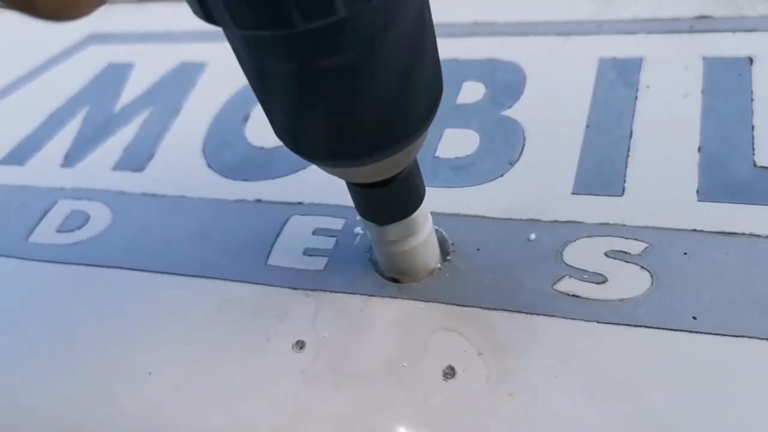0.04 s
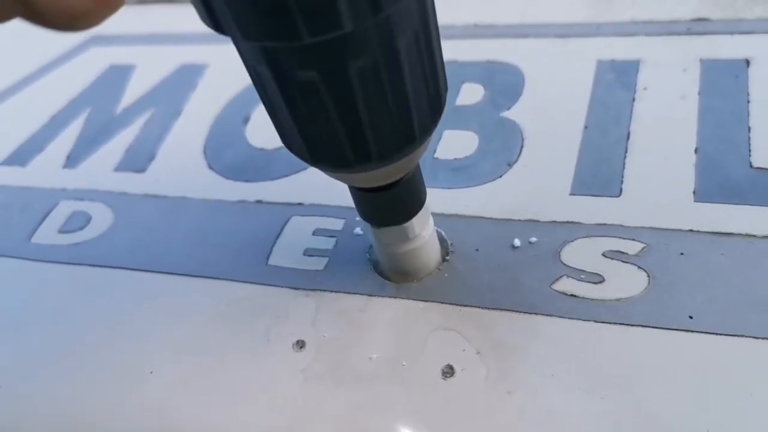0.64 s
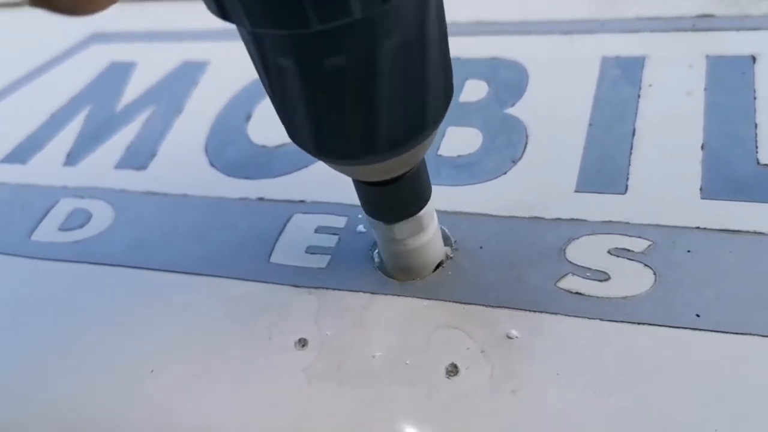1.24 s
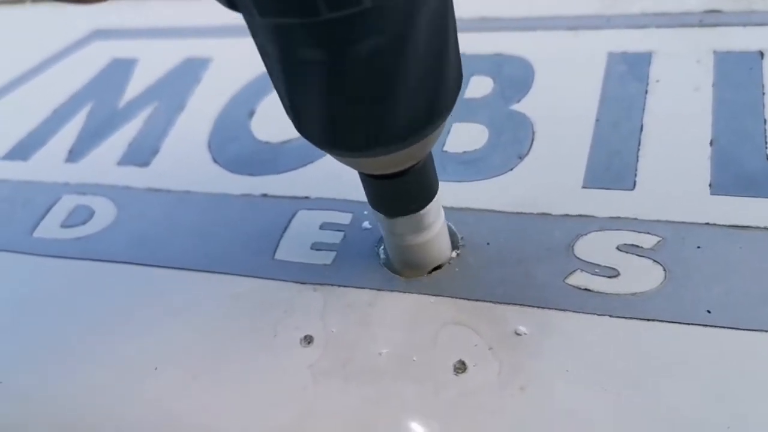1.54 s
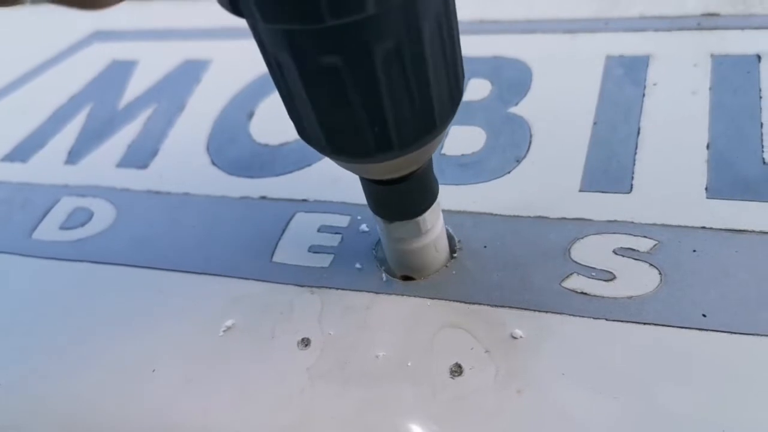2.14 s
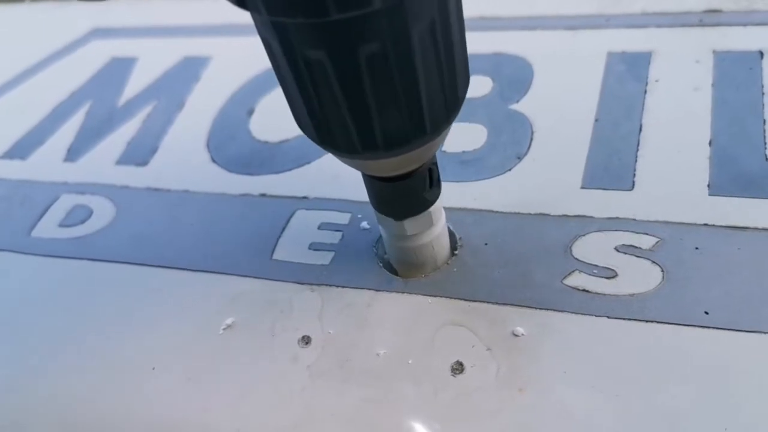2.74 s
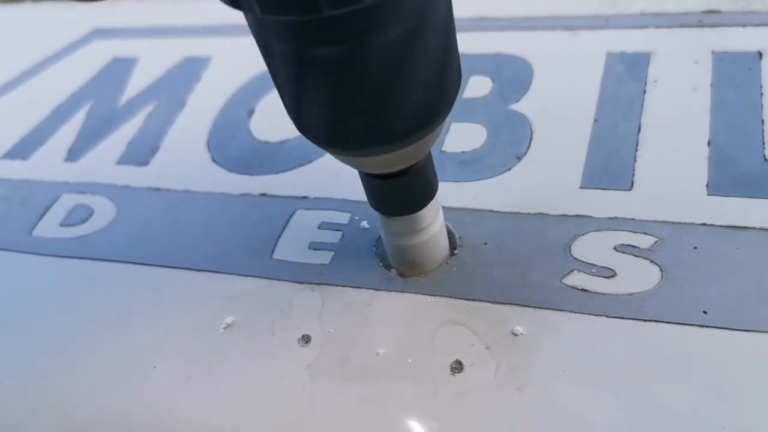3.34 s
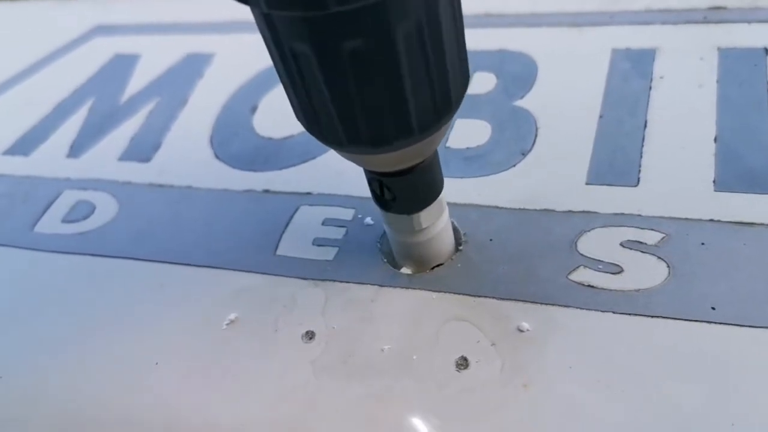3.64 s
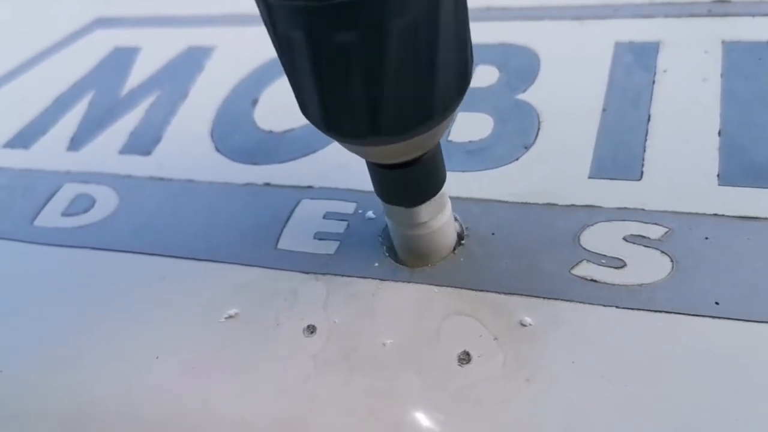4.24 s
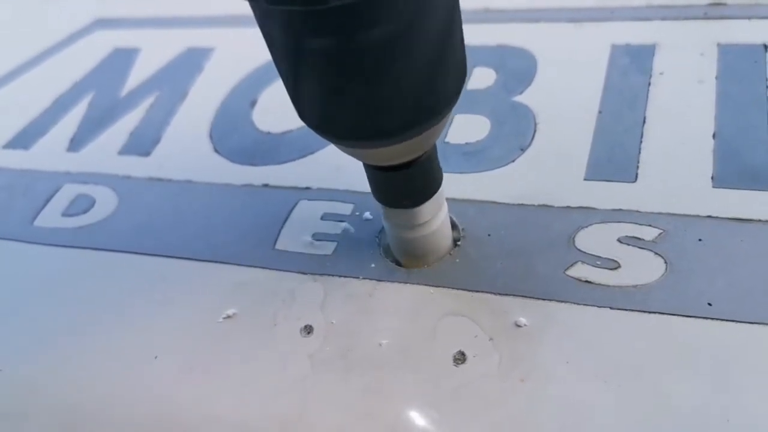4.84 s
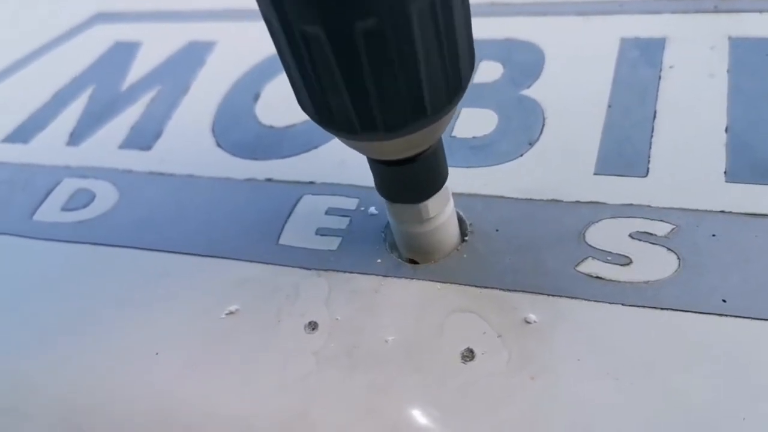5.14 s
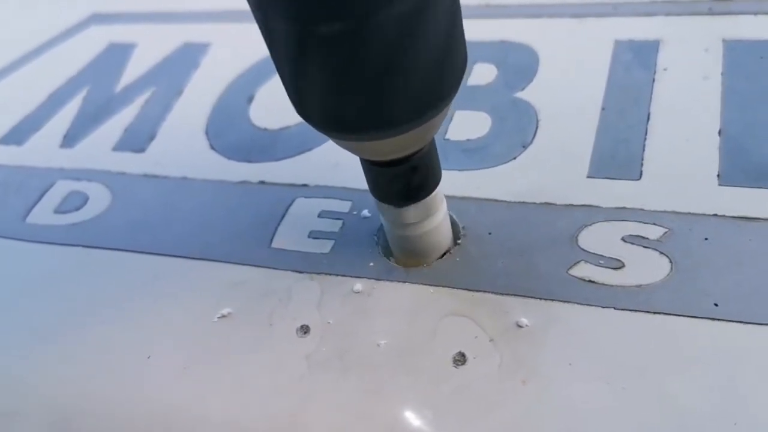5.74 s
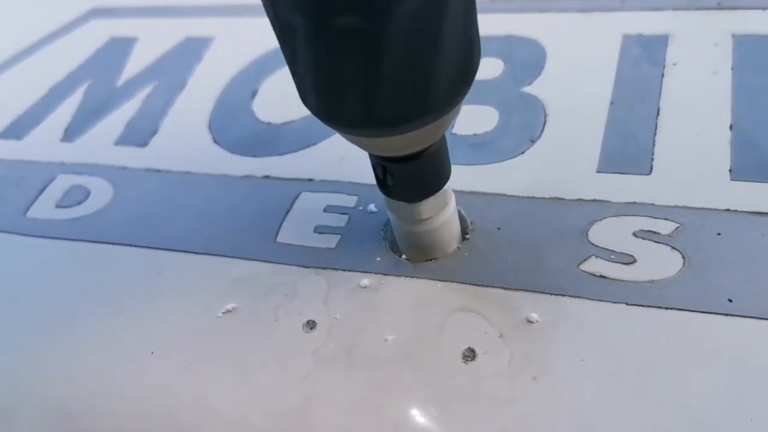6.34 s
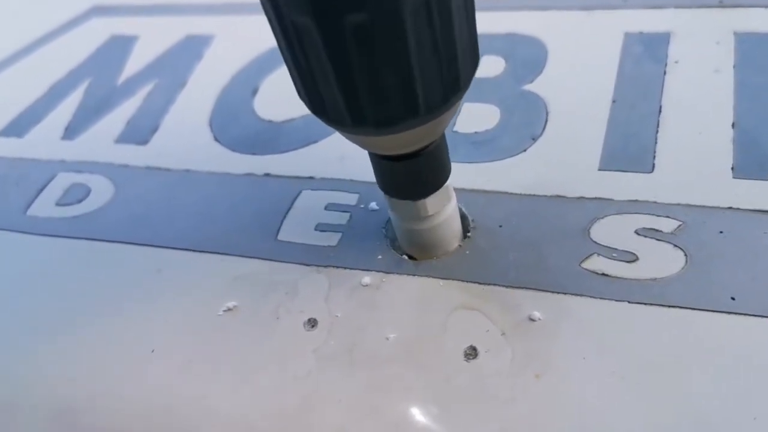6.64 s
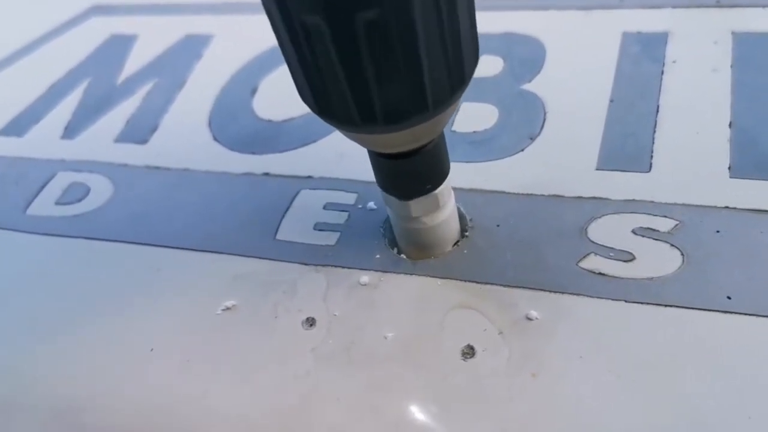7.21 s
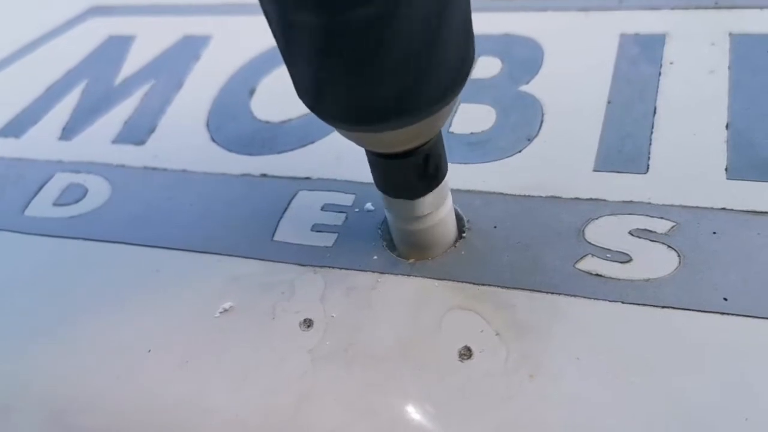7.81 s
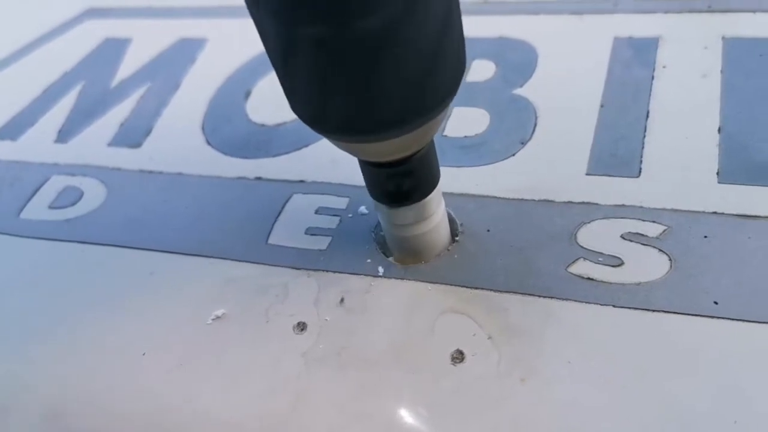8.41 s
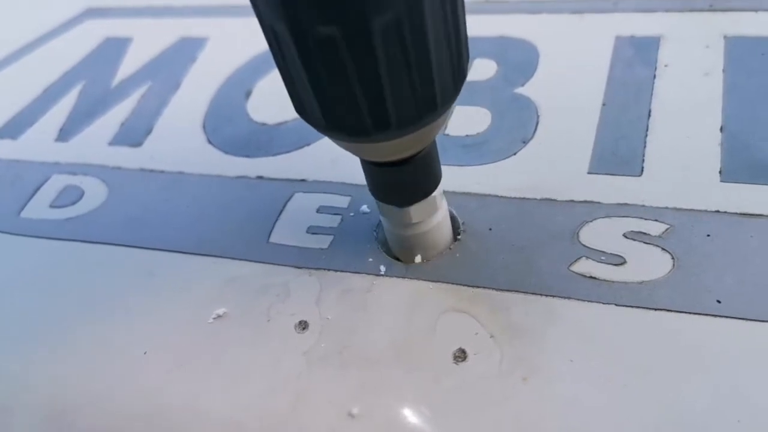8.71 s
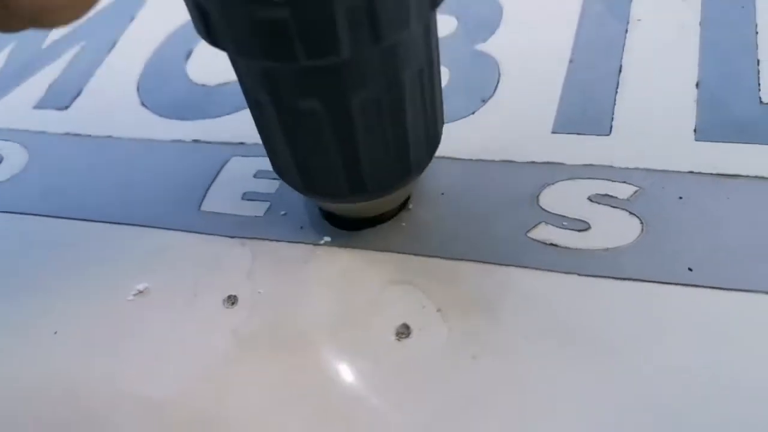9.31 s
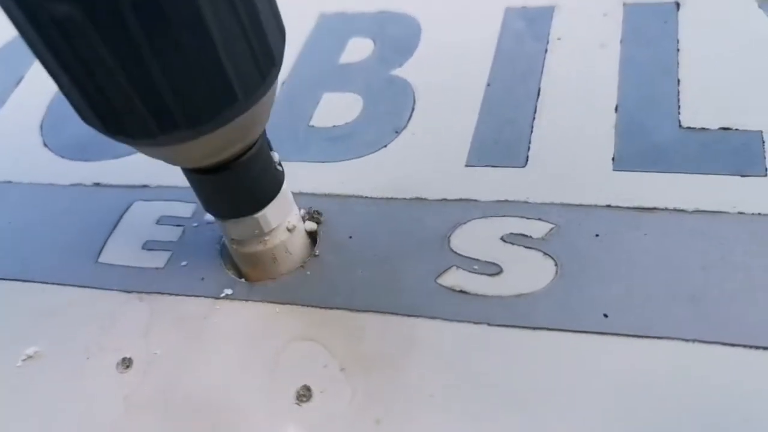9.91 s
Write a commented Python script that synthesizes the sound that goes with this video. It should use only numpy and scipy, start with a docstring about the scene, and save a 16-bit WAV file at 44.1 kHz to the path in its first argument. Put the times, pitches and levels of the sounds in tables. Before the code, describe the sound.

A cordless drill grinds a hole saw into a vehicle panel in short, rasping bursts, then breaks through with a thump.

```python
"""A cordless drill works a small hole saw through a vehicle's body panel in twenty short pulls, close by.
At each pull the trigger clicks and the motor whirls up: the saw rasps by friction, the gears whine at
multiples of the shaft speed, and the snagging teeth drive the panel's modes into a rattle over a low boom.
On the last pull the saw breaks through, the chuck thumps the panel, steel clacks and the saw scrapes out.
Quiet outdoor air lies underneath, and a soft rush comes up at the end."""
import sys
import numpy as np
from scipy import signal
from scipy.fft import rfft, irfft, next_fast_len
from scipy.io import wavfile
from scipy.ndimage import uniform_filter1d

SR = 44100
rng = np.random.default_rng(int(sys.argv[2]) if len(sys.argv) > 2 else 0)


def master(y):
    """Save y as 16-bit WAV."""
    cut = np.clip(np.atleast_2d(y).T, -1, 1)
    pcm = np.round(cut * 32767)  # scale
    wavfile.write(sys.argv[1], SR, pcm.astype(np.int16))


N = 439236
T = np.arange(N) / SR


def undb(db):
    """Amplitude ratio of a level in decibels."""
    return 10 ** (np.asarray(db) / 20)


def unit(x):
    """Normalisation to rms 1."""
    return x / np.sqrt(np.mean(x ** 2))


def since(s):
    """Time elapsed since s; zero before."""
    return np.maximum(T - s, 0)


def curve(rows):
    """Envelope interpolated through (t/s, level/dB) rows; silent before the first."""
    return undb(np.interp(T, *np.transpose(rows), left=-np.inf))


def burst(s, t60):
    """Exponential decay from a jump to 1 at time s."""
    out, span = np.zeros(N), slice(*np.searchsorted(T, [s, s + 2 * t60]))
    out[span] = undb(-60 * (T[span] - s) / t60)
    return out


def noise():
    """Uncorrelated white noise, left and right."""
    return rng.standard_normal((2, N))


def walk(rate, size=N):
    """Smooth random fluctuation with rate new values per SR steps; spread near 1."""
    hold = max(int(SR / rate), 1)
    steps = np.repeat(rng.standard_normal(size // hold + 1), hold)
    return 1.202 * uniform_filter1d(steps, hold)[:size]


def shape(x, response):
    """Linear filtering: the spectrum is multiplied by a frequency response."""
    size = next_fast_len(N + SR)
    hz = np.maximum(np.arange(size // 2 + 1) * SR / size, 1)
    return irfft(rfft(x, size) * response(hz), size)[..., :N]


def colour(x, points):
    """Spectral weighting through (f/Hz, level/dB) points."""
    hz, db = np.transpose(points)
    return shape(x, lambda f: undb(np.interp(np.log(f), np.log(hz), db)))


def ring(x, modes):
    """Superposition of damped resonators, given as (f/Hz, bandwidth/Hz, level/dB)."""
    return shape(x, lambda f: sum(undb(db) / (1 + 1j * (f * f - hz * hz) / (f * width))
                                  for hz, width, db in modes))


def pan(x, right_db):
    """A level difference between the sides places a source."""
    return x * undb(np.array([[-right_db], [right_db]]) / 2)


def two_paths(x, lead_s=0.00019, scatter_rad=1.52):
    """Path difference: the left side leads, and near reflections scatter its treble phase."""
    def response(f):
        scatter = scatter_rad * np.minimum(f / 2500, 1) * walk(14, size=len(f))
        return np.exp(1j * (scatter + 2 * np.pi * f * lead_s))
    return np.array([shape(x, response), x])


# spectrum of the outdoor air: f/Hz, relative level/dB
AIR_SPECTRUM = [(30, -2), (100, 1), (200, 0), (400, -9), (800, -12.5), (1300, -14.5), (2500, -16),
                (4000, -21), (6300, -31), (10000, -30), (13000, -39), (16000, -42)]


def outdoor_air(level_db=-61):
    """Ambient noise: mostly low, largely coherent between the sides, slowly drifting in level."""
    air = colour(rng.standard_normal(N) + 0.39 * noise(), AIR_SPECTRUM)
    return unit(air) * undb(level_db + walk(1.4))


# trigger pulls: start t/s, brake t/s, bite time constant/s, throttling (0 = full speed, 1 = held part way),
# lead of the click/s, panel boom level/dB
PULLS = [(0.05, 0.228, 0.013, 0.22, 0.035, -42.5), (.456, 0.612, 0.025, 0.28, 0.085, -45),
         (0.901, 1.038, .006, 0.96, 0.077, -55), (1.239, 1.384, .008, 0.91, 0.062, -45),
         (1.593, 1.773, .013, 0.14, 0.045, -38), (2.001, 2.203, .022, 0.01, .052, -41),
         (2.453, 2.661, 0.0089, 0.02, .08, -38), (2.897, 3.114, 0.022, 0, 0.061, -39),
         (3.374, 3.592, .012, 0, 0.052, -39), (3.855, 4.061, .008, 0.01, 0.055, -43),
         (4.312, 4.549, 0.0098, 0, 0.061, -40.5), (4.815, 5.027, .012, 0, .07, -46),
         (5.302, 5.518, 0.0089, 0, 0.079, -48), (5.788, 5.98, .014, 0, .074, -45.5),
         (6.243, 6.46, .012, 0.01, .073, -47), (6.75, 7.005, .017, 0, 0.053, -46.5),
         (7.32, 7.586, .012, 0, .072, -47), (7.844, 8.121, 0.0093, 0.01, .07, -42.5),
         (8.401, 8.717, .022, 0, 0.054, -49.5), (8.987, 9.304, 0.0076, 0.02, 0.057, -42.5)]


def trigger(click_db=-57, second_db=-4, gap_s=0.034, t60=0.019):
    """Two impact transients in plastic at each pull: the slider moves, then the switch closes."""
    first = undb(click_db) * sum(burst(start - lead, t60) for start, _, _, _, lead, _ in PULLS)
    second = undb(second_db) * np.interp(T - gap_s, T, first)
    plastic = colour(noise(), [(300, -15), (1500, -9), (2800, 6), (5000, -23), (10000, -3.5), (16000, -35)])
    return pan(unit(plastic), right_db=16) * (first + second)


def latest_pull():
    """Step functions of time: each column of the most recent pull."""
    rows = np.array(PULLS)
    return rows[np.maximum(np.searchsorted(rows[:, 0], T) - 1, 0)].T


FULL_HZ, THROUGH_S = 381, 9.18  # full shaft speed; the moment the saw is through


def motor(ease_s=.066, coast_s=.15, stall_s=.09, ease_t60=0.75, brake_t60=0.12, rattle_t60=0.15):
    """First-order lag: speed and force build at a pull, sag as the finger eases and fall under the brake."""
    start, brake, bite, throttling, _, _ = latest_pull()
    throttling = np.clip(throttling, 0, 1)
    # a trigger held part way chops the current, gathers speed more slowly and is let go more abruptly
    part_way = throttling ** 2
    ease = np.minimum(brake - ease_s * (1 - .8 * part_way), THROUGH_S)
    age, eased, braked = since(start), since(ease), since(brake)
    spin_up_s = .023 + .35 * bite + .012 * part_way
    spun = 1 - np.exp(-age / spin_up_s)
    coasting = np.exp(-eased / coast_s - braked / stall_s)
    hz = (FULL_HZ - 43.97 * throttling) * spun * coasting * (1 + .003 * walk(40))
    # the gears strain hard while speeding up and a little while slowing down
    torque = np.minimum(1 - spun + .08 * (1 - coasting), 1)
    pressed = undb(-22 - 6 * part_way) * (1 - np.exp(-age / bite)) ** 1.25
    force = pressed * undb(-60 * (eased / ease_t60 + braked / brake_t60))
    # fast teeth hiss brighter
    treble = undb(2.5 - 7 * part_way) * spun ** 0.23 * coasting
    # slow teeth snag hardest, and the panel rattles less as the saw sinks in
    snag_db = 4 * np.exp(-age / 0.095) - 60 * braked / rattle_t60
    depth = np.cumsum(hz) / np.sum(hz)
    rattle = pressed * undb(np.interp(depth, [0, 1], [-10, -20.5]) + 5.5 * part_way + snag_db)
    chop = (part_way + 2.0 * np.exp(-age / 0.031)) * np.exp(-eased / .015)
    return hz, force, torque, chop, treble, rattle


# spectrum of gearbox and saw: f/Hz, left relative level/dB, right relative level/dB
GRIND_SPECTRUM = [(396, -2, -2), (974, -15.5, -12), (2067, -11, 0.0), (3000, -12.5, -0.8), (3216, -6, -8.5),
                  (4150, -8, 0.87), (5440, -9.5, -13), (6460, -19.5, -12.5), (6910, -21.5, -5),
                  (7730, -16.5, -14.5), (9230, -14, -7), (10580, -13, -8.5), (11830, -21, -18.5),
                  (15700.0, -19.5, -18.5)]


def grinding(turns, treble, worn_db=-5.0, carrier_ratio=4.5):
    """Friction noise: tooth flaws recur with each turn of the planet carrier, while grit never repeats."""
    flaws = rng.standard_normal(512)
    worn = np.interp(turns / carrier_ratio % 1 * 512, np.arange(512), flaws)
    grit = noise() * undb(walk(1800) + 0.98 * walk(150))
    contact = undb(worn_db) * two_paths(unit(worn)) + unit(grit)
    hz, *sides = np.transpose(GRIND_SPECTRUM)
    rasp = np.array([colour(x, np.c_[hz, db]) for x, db in zip(contact, sides)])
    rasp = unit(shape(rasp, lambda f: 1 / (1 + (480 / f) ** 4)))
    hiss = shape(rasp, lambda f: 1 / (1 + (6000 / f) ** 6))
    return rasp + (treble * undb(1.2 * walk(30)) - 1) * hiss


def shaft_tones(turns, partials, waver_db, slack_rad):
    """Rotational orders: partials locked to the shaft, each wavering in level and phase."""
    return sum(undb(db + waver_db * walk(50)) * np.sin(2 * np.pi * order * turns + slack_rad * walk(150))
               for order, db in partials)


# the strongest shaft-locked tones, gear mesh and, at 1.49x, the saw's teeth passing: multiple of shaft speed,
# relative level/dB
MESH_ORDERS = [(1.49, -17.5), (4.923, -12.5), (7.848, -17), (10, -20), (13, -13.5)]
# fainter motor and gear tones: multiple of shaft speed, relative level/dB
WHINE_ORDERS = [(.78, -24), (3.79, -32.5), (5.81, -25), (6.6, -27), (9.08, -34.5), (11.1, -20.5),
                (11.8, -47.5), (15.7, -25.5), (18.3, -21.5), (26, -17)]
# radiation response of the drill's housing: f/Hz, level/dB
HOUSING_RESPONSE = [(150, -14), (300, -3), (580, 0), (1000, -16), (1500, -8), (1800, 0), (5000, 0),
                    (12000, -3)]
# the housing's resonance, as one of two equal stages: f/Hz, bandwidth/Hz, level/dB
HOUSING_MODE = [(3000, 950, 0)]


def gears(turns, torque, grate_db=14.0, chirp_db=7.5):
    """Forced vibration: mesh tones whine, and chirp as they sweep through the housing's resonance."""
    mesh = shaft_tones(turns, MESH_ORDERS, waver_db=2, slack_rad=.12)
    faint = shaft_tones(turns, WHINE_ORDERS, waver_db=3, slack_rad=.25)
    whine = colour(mesh + faint, HOUSING_RESPONSE)
    strained = shaft_tones(turns, [(10, -4), (13, 0), (15.7, -3)], waver_db=2.5, slack_rad=.4)
    strained = strained * torque * undb(2.5 * walk(700))
    # strained teeth also grate, once they are moving
    grating = undb(grate_db) * torque * (1 - torque) * rng.standard_normal(N)
    chirps = ring(ring(strained + grating, HOUSING_MODE), HOUSING_MODE)
    return pan(two_paths(whine + undb(chirp_db) * chirps), right_db=4.5)


def whistle(hz, turns, chop_hz=7850, lower_db=-14, upper_db=-17):
    """Amplitude modulation: the turning rotor splits the controller's chopping tone into two sidebands."""
    lower, upper = (np.sin(2 * np.pi * (chop_hz * T + side * 2 * turns)) for side in (-1, 1))
    return pan((undb(lower_db) * lower + undb(upper_db) * upper) * hz / FULL_HZ, right_db=17.5)


# bending modes of the panel: f/Hz, relative level/dB, free decay T60/s
PANEL_MODES = [(53, -16, 0.28), (150, -11, 0.14), (203, 3, 0.053), (244.4, 0, 0.093), (314.7, 1, 0.037),
               (401, 3, 0.092), (523, 2.5, 0.045), (571, -2.5, 0.048), (617, -11, 0.051),
               (750, -37.5, 0.086)]


def panel(force, damping=1):
    """Modal response of the sheet: added damping widens each mode and shortens its decay."""
    return ring(force, [(hz, damping * np.log(1000) / np.pi / t60, db) for hz, db, t60 in PANEL_MODES])


def panel_rattle():
    """Random excitation: saw teeth snag on the rim of the hole; the higher modes reach the left weaker."""
    sheet = unit(panel(rng.standard_normal(N) * undb(2.25 * walk(250))))
    shaded = colour(sheet, [(150, 1), (300, -1.2), (600, -8.5)])
    return np.array([shaded, sheet])


def drill(rasp_db=-1.21):
    """Superposition of rasp, gears, whistle and rattle, all driven by one motor."""
    hz, force, torque, chop, treble, rattle = motor()
    turns = np.cumsum(hz) / SR
    # the rasp grows as the teeth come up to speed
    rasp = undb(rasp_db) * grinding(turns, treble) * (1 - torque) ** 0.25
    rattling = panel_rattle() * rattle
    return force * (rasp + gears(turns, torque) + chop * whistle(hz, turns)) + rattling


# spectrum of the flexing panel: f/Hz, relative level/dB
BOOM_SPECTRUM = [(20, -9.5), (35, -11.5), (53, 1), (75, -9), (110, -13.5), (170, -16), (400, -69)]
# dull thuds as the weight on the drill shifts: t/s, level/dB
SHOVES = [(3.69, -47), (3.78, -48), (7.79, -45.5), (8.16, -43), (8.49, -39.5)]


def panel_boom(swell_s=0.091, linger_s=0.018, t60=0.46, shove_s=0.041, thump_db=-24, rest_db=-64):
    """Low-frequency flexure: pulls, shoves and the chuck's first blow add in power to make the panel boom."""
    start, brake, _, _, _, boom_db = latest_pull()
    pulled = (1 - np.exp(-since(start) / swell_s)) * undb(boom_db - 60 * since(brake + linger_s) / t60)
    shoved = sum(undb(db) * np.exp(-((T - s) / shove_s) ** 2) for s, db in SHOVES)
    thumped = undb(thump_db) * burst(CHUCK_BLOWS[0][0], t60=0.64)
    envelope = np.sqrt(pulled ** 2 + shoved ** 2 + thumped ** 2 + undb(rest_db) ** 2)
    boom = unit(colour(rng.standard_normal(N) + 0.53 * noise(), BOOM_SPECTRUM))
    return pan(boom * envelope, right_db=-6.0)


# the chuck lands on the panel and bounces: t/s, peak level/dB, contact time/s
CHUCK_BLOWS = [(9.163, -3, 0.0033), (9.1838, -23, 0.0027), (9.194, -24.5, 0.012), (9.244, -33, 0.016)]


def chuck_thumps():
    """Impact radiation: the sheet, damped by the chuck, radiates the rate of change of each force pulse."""
    thumps = 0
    for s, db, contact_s in CHUCK_BLOWS:
        force = np.sin(np.pi * np.clip((T - s) / contact_s, 0, 1)) ** 2
        blow = panel(np.gradient(force), damping=1.42)
        thumps = thumps - undb(db) * blow / np.abs(blow).max()
    return pan(thumps, right_db=3.0)


# the spindle stops and the saw knocks in its hole: t/s, relative level/dB, T60/s
STEEL_KNOCKS = [(9.295, -11.5, 0.038), (9.298, -10, 0.027), (9.348, -27, 0.022), (9.413, -23, 0.0068),
                (9.472, -45, .03), (9.53, -32, 0.017)]


def steel_clacks(knock_db=-12.5, crack_db=-22):
    """Hard contacts give broadband transients: a crack ends the chuck's first blow, then steel knocks."""
    spectrum = [(200, -1), (1000, -14), (2400, -1), (4200, -3.5), (6500, -13), (15000, -19)]
    steel = unit(colour(noise(), spectrum))
    landing_s, _, contact_s = CHUCK_BLOWS[0]
    crack = undb(crack_db) * burst(landing_s + contact_s, t60=0.071)
    knocks = sum(undb(db + knock_db) * burst(s, t60) for s, db, t60 in STEEL_KNOCKS)
    return pan(steel * (crack + knocks), right_db=8)


# swell of the closing rush: t/s, level/dB
RUSH_ENVELOPE = [(8, -91), (9.2, -69), (9.45, -51.5), (9.65, -55), (9.96, -71)]
# spectrum of the rush: f/Hz, relative level/dB
RUSH_SPECTRUM = [(59, -32), (100, -16), (190, 1), (312, -14), (512, -8.5), (841, -28), (1250, -7),
                 (1530, -29), (2050, -11.5), (2730, -29), (6380, -32.5), (7530, -36), (8880, -29.5),
                 (10100, -32), (14000, -35)]


def soft_rush():
    """Partly coherent broadband noise swells and fades on the right at the end."""
    rush = unit(colour(rng.standard_normal(N) + noise(), RUSH_SPECTRUM))
    return pan(rush * curve(RUSH_ENVELOPE), right_db=11.5)


# course of the scrape as the saw is drawn out: t/s, level/dB
SCRAPE_ENVELOPE = [(9.49, -59), (9.503, -41), (9.508, -30.5), (9.53, -34), (9.55, -39), (9.575, -63),
                   (9.7, -67)]
# resonances of the saw in its hole: f/Hz, bandwidth/Hz, relative level/dB
SAW_MODES = [(630, 260, 6.5), (867, 41, 3), (2130, 110, -4), (4150, 240, -3)]


def saw_scrape():
    """Sliding friction excites the saw's resonances as it is drawn back out."""
    rub = colour(noise() * undb(2.6 * walk(400)), [(250, -6), (550, 0), (4600, -1.5), (7000, -11)])
    return pan(unit(ring(rub, SAW_MODES)) * curve(SCRAPE_ENVELOPE), right_db=8)


def reflections(x, near_db=-19, near_t60=0.16, far_db=-27, far_t60=0.51):
    """Reverberation by convolution: quick reflections off the vehicle, a faint tail from the surroundings."""
    t = T[:SR]
    near, far = (rng.standard_normal((2, SR)) * undb(-60 * t / t60) * (t > .004)
                 for t60 in (near_t60, far_t60))
    response = (undb(near_db) * unit(near) + undb(far_db) * unit(far)) / np.sqrt(SR)
    reflected = signal.fftconvolve(x, response, axes=1)[:, :N]
    return colour(reflected, [(150, 3.5), (700, 10.5), (3000, -1.0), (7000, -1.5), (15000, -8)])


def scene():
    """Superposition of the direct sound, its reflections, the boom, the air and the rush."""
    direct = drill() + trigger() + chuck_thumps() + steel_clacks() + saw_scrape()
    return direct + reflections(direct) + panel_boom() + outdoor_air() + soft_rush()


def record(dry):
    """Band limiting: a steep low-pass removes the treble above 15750 Hz."""
    return signal.sosfilt(signal.ellip(10, .2, 80, 15750, fs=SR, output="sos"), dry)


dry = scene()
out = record(dry)
master(out)
```